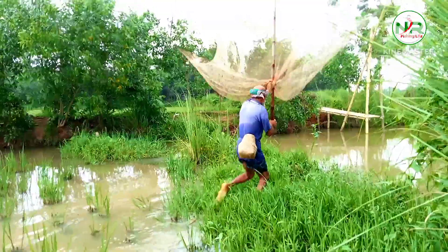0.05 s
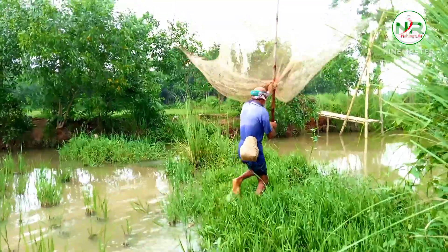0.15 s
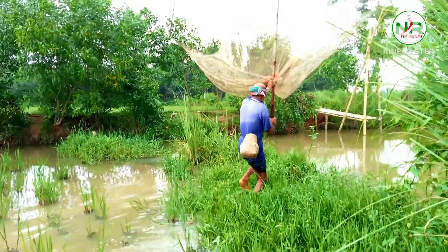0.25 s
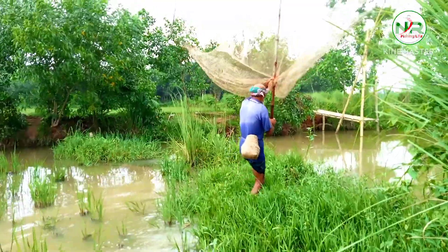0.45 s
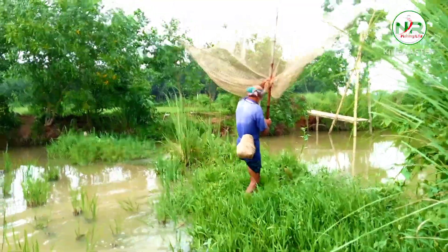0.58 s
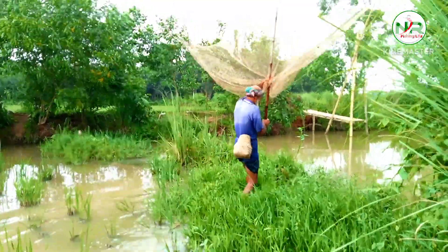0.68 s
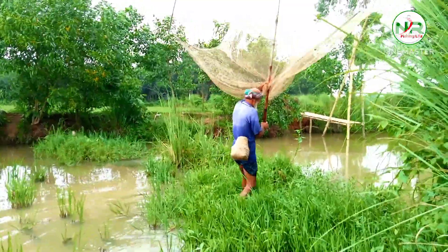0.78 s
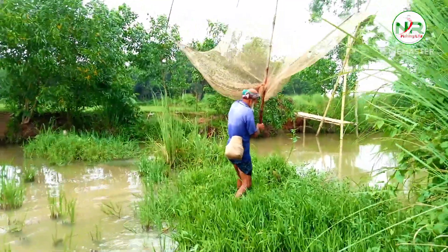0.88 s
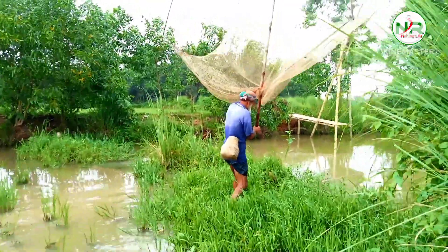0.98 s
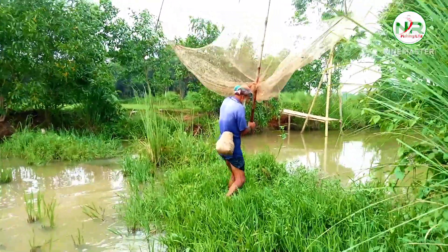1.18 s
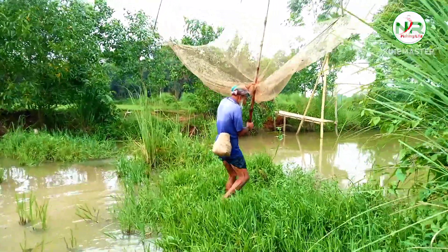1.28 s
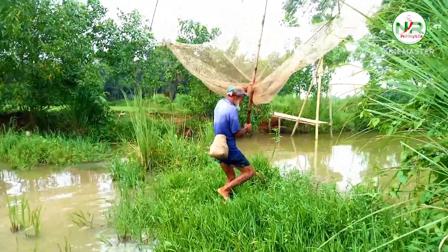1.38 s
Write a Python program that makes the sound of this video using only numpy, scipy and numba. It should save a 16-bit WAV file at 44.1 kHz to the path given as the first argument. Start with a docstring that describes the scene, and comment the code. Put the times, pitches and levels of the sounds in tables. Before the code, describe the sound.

Water sloshes around a fishing net a few metres away, starting at about 0.15 seconds with popping bubbles, fizz and ticking drops. It is loudest from 0.6 to 1 second, then fades. Wind softly bumps the microphone, mostly around 1 second, over faint hiss and distant insects. A far bird trills faintly downwards from 1.2 seconds. Near 1.4 seconds the water stops and the hiss drops.

```python
"""A grassy canal bank, a phone microphone a few metres from where a lift net is hauled.
The water sloshes: trapped bubbles ring and pop, many gliding up, over fizz and ticks of spray,
with a short scatter from the banks. Wind rumbles and bumps on the microphone, far insects
shimmer and a far bird trills downwards. Near the end the water stops abruptly and the
open-air hiss drops."""
import sys
import numpy as np
from scipy import signal
from scipy.fft import rfft, irfft
from scipy.io import wavfile
from scipy.ndimage import uniform_filter1d
from numba import njit

SR = 44100
rng = np.random.default_rng(int(sys.argv[2]) if len(sys.argv) > 2 else 0)


def put_to_file(sound):
    """Save the sound as 16-bit audio at rate SR, in the file named by the first command-line argument."""
    columns = np.atleast_2d(sound).T  # one column per channel
    safe = np.clip(columns, -1, 1)
    whole_steps = np.round(safe * 32767)
    wavfile.write(sys.argv[1], SR, whole_steps.astype(np.int16))


N = 63945
DROP_S = 1.371  # the water stops and the hiss drops


def undb(db):
    """Decibels to gain."""
    return 10 ** (np.asarray(db) / 20)


def unit(x):
    """Scale to rms 1."""
    return x / np.sqrt(np.mean(x ** 2))


def curve(table, col=1):
    """One column of a time table at every sample."""
    rows = np.array(table)
    return np.interp(np.arange(N) / SR, rows[:, 0], rows[:, col])


def colour(x, points):
    """Shape a sound by (frequency [Hz], gain [dB]) points."""
    hz, db = np.array(points).T
    bin_hz = np.maximum(np.arange(N // 2 + 1) * SR / N, 1)
    return irfft(rfft(x) * undb(np.interp(np.log(bin_hz), np.log(hz), db)), N)


def band(x, lo_hz, hi_hz):
    """Band-pass."""
    return signal.sosfilt(signal.butter(2, [lo_hz, hi_hz], "band", fs=SR, output="sos"), x)


def noise_band(lo_hz, hi_hz):
    """Band of noise at rms 1."""
    return unit(band(rng.standard_normal(N), lo_hz, hi_hz))


def walk(per_s):
    """Random steps, smoothed twice; rms 1."""
    hold = int(SR / per_s)
    steps = np.repeat(rng.standard_normal(N // hold + 1), hold)
    return unit(uniform_filter1d(uniform_filter1d(steps, hold), hold)[:N])


@njit
def ring(start_s, hz, gain, decay_s, rise, attack_ms):
    """Damped sines with a soft start; the pitch moves by the fraction `rise` per decay time."""
    out = np.zeros(N)
    for k in range(len(start_s)):
        first, decay = int(start_s[k] * SR), decay_s[k]
        attack = min(attack_ms / 1e3, decay)
        peak_s = attack * np.log(1 + decay / attack)
        phasor = gain[k] / ((1 - np.exp(-peak_s / attack)) * np.exp(-peak_s / decay)) + 0j
        turn = np.exp(2j * np.pi * hz[k] / SR - 1 / (decay * SR))
        glide = np.exp(2j * np.pi * hz[k] * rise[k] / (decay * SR * SR))
        shut, opening = 1., np.exp(-1 / (attack * SR))
        for i in range(min(int(5 * decay * SR), N - first)):
            out[first + i] += (1 - shut) * phasor.imag
            phasor *= turn
            turn *= glide
            shut *= opening
    return out


# Spectrum of the open air on the bank (frequency [Hz], relative level [dB])
AIR_SPECTRUM = [(100, -17), (180, -9), (300, -11.5), (600, -14.5), (1200, -17.5), (3400, -16), (4500, -19),
                (6400, -29), (9400, -22), (12000, -23.5), (15500, -26)]


def air(ring_hz=4390, width_hz=280):
    """Open-air hiss all around, with a faint high ring; both drop near the end."""
    hiss = unit(colour(rng.standard_normal(N), AIR_SPECTRUM)) * undb(-59.5 + walk(per_s=12.1))
    high_ring = noise_band(ring_hz - width_hz / 2, ring_hz + width_hz / 2) * undb(-78)
    return (hiss + high_ring) * np.where(np.arange(N) < DROP_S * SR, 1, undb(-8))


# Wind rumble on the microphone (time [s], level [dB])
WIND_LEVEL = [(0, -71), (.02, -69), (.076, -77), (.12, -71), (.152, -77), (.33, -69), (.512, -63.5),
              (.528, -75), (.626, -70), (.66, -67), (.844, -65.5), (.92, -53), (.96, -63), (1.032, -64),
              (1.066, -63.5), (1.166, -60), (1.25, -66), (1.36, -74), (1.45, -78)]
# Buffets on the microphone (time [s], pitch [Hz], level [dB], decay [ms])
WIND_BUMPS = [(.105, 59.4, -56.5, 12), (.6, 210, -40.5, 26), (0.879, 90.5, -47, 5.1), (0.912, 70, -45, 10),
              (0.941, 79.4, -49, 11), (0.981, 105, -41, 15), (1.021, 78, -34.5, 10.4),
              (1.054, 90, -51, 7.9), (1.087, 82, -41, 4.7), (1.107, 90, -40, 4.1), (1.129, 89.5, -52, 4.9),
              (1.148, 111, -43.5, 5.6)]


def wind():
    """Wind right on the microphone: a low rumble with separate bumps."""
    start_s, hz, db, decay_ms = np.array(WIND_BUMPS, float).T.copy()
    bumps = ring(start_s, hz, undb(db), decay_ms / 1e3, rise=np.zeros_like(hz), attack_ms=5.9)
    rumble = noise_band(lo_hz=55.3, hi_hz=151) * undb(curve(WIND_LEVEL))
    return bumps + rumble


# Insects in the distance (time [s], level [dB])
INSECT_LEVEL = [(0, -79), (.1, -60.5), (.14, -67), (.3, -62.5), (.55, -63), (.9, -67), (1.05, -72),
                (1.2, -70.5), (1.36, -69), (1.38, -75)]


def insects():
    """Far insects, heard from the bank as one narrow, flickering band."""
    flicker_db = 4 * walk(per_s=29.9)
    return noise_band(lo_hz=9000, hi_hz=10330) * undb(curve(INSECT_LEVEL) + flicker_db)


def swarm(per_s, lo_hz, hi_hz, cycles, rise, spread_db, shift=((0, 0), (1, 0))):
    """Bubbles of random time, size and strength, each decaying in about `cycles` periods; rms 1."""
    when, pitch, strength, length = rng.random((int(per_s * N / SR), 4)).T
    start_s = when * N / SR
    octaves = np.interp(start_s, *np.array(shift).T)
    hz = lo_hz * (hi_hz / lo_hz) ** pitch * 2 ** octaves
    db = np.minimum(-spread_db * np.log(1 - strength), 8.5)  # many weak, a few strong
    decay_s = cycles * (.5 + length) / hz
    return unit(ring(start_s, hz, undb(db), decay_s, np.full_like(hz, rise), attack_ms=1.7))


# Churn at the net (time [s], small-bubble level [dB], fizz level [dB], spray level [dB])
CHURN_LEVELS = [(0.12, -68, -79, -59), (0.15, -76, -61, -79), (0.17, -54, -54.5, -61),
                (0.24, -58, -57.5, -63.5), (0.28, -58.5, -56, -62), (0.3, -47, -54, -58.5),
                (0.37, -49.5, -50, -58), (0.42, -45.5, -50, -56), (0.47, -51, -48, -51),
                (0.54, -52, -57, -61.5), (0.587, -50.5, -48.5, -61.5), (0.595, -38, -43, -44.5),
                (0.63, -37.5, -44, -47.5), (0.7, -47, -46.5, -54.5), (0.74, -42.5, -46.5, -49.5),
                (0.78, -47, -43.5, -53), (0.81, -49, -51.5, -61), (0.89, -48.5, -49, -59),
                (1.02, -53, -58, -62), (1.06, -62, -62, -68), (1.14, -62.5, -57, -60.5),
                (1.17, -64, -63.5, -68), (1.25, -89, -70, -63), (1.36, -84, -75, -73)]
# Changing size of the small bubbles (time [s], pitch shift [octaves])
SMALL_BUBBLE_SHIFT = [(.12, 0.87), (0.269, 0.63), (.36, -0.034), (.53, -0.13), (0.559, 0.19), (.62, -0.06),
                      (0.701, 0.526), (.9, 0.51), (0.94, 0.074), (1.05, 0.24)]


def churn():
    """Water stirred by the net a few metres off: bubble swarms from low wash to fine spray."""
    small = swarm(per_s=1500, lo_hz=377.6, hi_hz=1208, cycles=2.97, rise=0.08, spread_db=3.5,
                  shift=SMALL_BUBBLE_SHIFT)
    fizz = swarm(per_s=3500, lo_hz=1177, hi_hz=4920, cycles=2.03, rise=0.051, spread_db=3)
    spray = swarm(per_s=11000, lo_hz=5080, hi_hz=15160, cycles=2.5, rise=0.017, spread_db=1.5)
    wash = swarm(per_s=340, lo_hz=291.4, hi_hz=516, cycles=3.5, rise=0.06, spread_db=5.5)
    crackle = swarm(per_s=230, lo_hz=2150, hi_hz=6630, cycles=1.23, rise=0.03, spread_db=6.5)
    spatter_db = 2 * walk(per_s=130)
    burst_db = 2 * walk(per_s=160)
    low = (small * undb(-2.5) + wash * undb(-16.5)) * undb(curve(CHURN_LEVELS, 1))
    mid = (fizz * undb(-0.64 + spatter_db) + crackle * undb(-8.5)) * undb(curve(CHURN_LEVELS, 2))
    high = spray * undb(curve(CHURN_LEVELS, 3) + burst_db)
    swell = undb(curve([(0, -9), (0.14, 0)]))  # up from calm water
    return (low + mid + high) * swell


# Loud bubbles at the net
# (time [s], pitch [Hz], level [dB], decay [ms], pitch rise [fraction per decay time])
LOUD_BUBBLES = [(0.159, 1340, -48, 3.5, -0.012), (0.1745, 2126, -47.6, 8.6, -0.041),
                (0.215, 3540, -39, 1.5, -0.063), (0.214, 2890, -36, 1.13, -0.03),
                (0.215, 4510, -45, 1.5, -0.021), (0.217, 1226, -43, 4.7, 0.067),
                (0.2877, 658, -42, 2.5, 0.0078), (0.2957, 590, -36.5, 11.4, 0.064),
                (0.313, 690, -46.5, 4.4, 0.003), (0.339, 1640, -44.5, 3.4, -0.0015),
                (0.3453, 1187, -32.5, 2.7, -0.062), (0.362, 350, -47, 7.5, 0.23),
                (0.3737, 458, -42, 22.7, 0.087), (0.398, 580, -41, 5.4, 0.11),
                (0.411, 580, -46, 6.2, 0.067), (0.432, 513, -43.5, 11, -0.039), (0.434, 1644, -49, 23, 0.2),
                (0.4355, 2630, -39, 1.2, 0.031), (0.4586, 3160, -44, 3.1, -0.1),
                (0.461, 398, -45.5, 5.8, 0.029), (0.4608, 776, -38, 4.3, -0.016),
                (0.4659, 1110, -35.5, 3.5, 0.06), (0.48, 410, -45.5, 13, 0.016),
                (0.511, 400, -45, 6.3, -0.02), (0.522, 1076, -43, 2.4, 0), (0.522, 2420, -43.5, 1.9, 0.019),
                (0.541, 630, -47.5, 5.7, -0.034), (0.541, 1120, -41, 2.5, -0.057),
                (0.581, 546, -36, 2.5, 0.065), (0.5947, 1910, -42, 11, -0.02),
                (0.5946, 832, -31.5, 2.4, -0.13), (0.5986, 720, -36.5, 20, 0.056),
                (0.599, 461.5, -33, 21, 0.24), (0.5997, 2880, -35, 2.5, 0.063),
                (0.6048, 2130, -39, 7.5, -0.039), (0.605, 1352, -37.5, 5.9, 0.12),
                (0.607, 621, -35, 8.3, -0.12), (0.6132, 743, -42, 13, 0.052),
                (0.619, 3440, -29.5, 1.55, 0.018), (0.6201, 364, -37, 6.2, -0.0025),
                (0.625, 273, -37, 5.6, 0.022), (0.6295, 865, -42, 1.6, -0.023),
                (0.6469, 496, -33, 6.2, 0.264), (0.6534, 832, -37.5, 22.3, -0.041),
                (0.657, 1090, -34, 4.5, 0.081), (0.6632, 770, -40, 1.9, -0.03),
                (0.6816, 1018, -30.5, 1.84, -0.01), (0.7191, 818, -37.5, 6.8, 0.06),
                (0.7307, 2320, -35.5, 1.94, 0.133), (0.7318, 3510, -46.5, 9.2, 0.014),
                (0.7323, 930, -35, 2.1, -0.037), (0.7405, 1870, -34, 1.9, 0.2),
                (0.7543, 1916, -45.5, 11, 0.1), (0.765, 1230, -49, 7.0, 0.17),
                (0.7647, 2600, -39.5, 2.2, 0.048), (0.7697, 1950, -33, 1.1, -0.0091),
                (0.7865, 1680, -37.5, 2.4, 0.042), (0.8004, 693, -41.5, 9.3, 0.34),
                (0.8358, 1770, -34, 1.8, 0.18), (0.85, 558, -50, 7, -0.073),
                (0.853, 3290, -40.5, 1.7, -0.00054), (0.862, 3876, -40, 1.9, -0.1),
                (0.8756, 694, -30.5, 5, 0.24), (0.875, 1154, -33.5, 2.9, -0.039),
                (0.884, 917, -34.5, 6, 0.027), (0.8794, 1444, -37, 8.3, -0.041),
                (0.879, 1756, -40.5, 6, 0.089), (0.891, 1425, -41, 4.7, 0.038),
                (0.8964, 2870, -43, 3.8, 0.025), (0.928, 455, -45, 5, 0.0022),
                (0.938, 463, -39.5, 8.3, -0.12), (0.965, 3240, -46.5, 2.2, -0.02),
                (0.9663, 1597, -41, 6.2, 0.2), (0.9822, 396, -37.5, 8.9, -0.063),
                (0.9832, 724, -38, 11.8, 0.16), (0.9838, 1655, -48, 8.1, 0.08), (1.0, 1265, -37, 6.7, 0.08),
                (1.0058, 1398, -34.5, 4.4, 0.033), (1.0021, 920, -40, 6.1, 0.012),
                (1.021, 1353, -42.5, 7.3, 0.06), (1.068, 1400, -46, 5.4, 0.064),
                (1.104, 830, -51.5, 3.3, 0.031), (1.1314, 1016, -47.5, 12, -0.055),
                (1.131, 4560, -50.5, 1.4, -0.051), (1.168, 2480, -54.5, 3.8, -0.03),
                (1.223, 1130, -55, 3.8, -0.025)]


def bubbles():
    """Single pockets of air ring out above the churn, gliding as they fade, slightly rough."""
    start_s, hz, db, decay_ms, rise = np.array(LOUD_BUBBLES, float).T.copy()
    pops = ring(start_s, hz, undb(db), decay_ms / 1e3, rise, attack_ms=2.3)
    rough_db = 1.18 * walk(per_s=300)
    return pops * undb(rough_db)


# Droplets a few metres off (time [s], level [dB], centre [Hz], half width [octaves])
DROPLET_TICKS = [(0.215, -41.5, 9540, 0.11), (0.2155, -40.5, 3420, 0.82), (.362, -39, 4260, 0.33),
                 (.398, -43.5, 9620, .4), (.484, -38.5, 4570, 0.36), (.597, -47, 10500, 0.52),
                 (.602, -44, 9300, .15), (0.619, -35.5, 8600, 0.45), (.636, -43, 4450, 0.21),
                 (.657, -44, 9000, .2), (0.6628, -44, 12000, 0.34), (0.666, -44, 6840, 0.087),
                 (.698, -49, 11000, .15), (0.7079, -35.5, 7800, 0.6), (0.7126, -45, 12500, 0.29),
                 (.7175, -44, 9000, .12), (.728, -48, 12500, .3), (0.7336, -34.5, 9900, .4),
                 (.7375, -37, 6500, 0.27), (.745, -46, 9800, 0.29), (.765, -42, 9800, 0.25),
                 (0.7843, -36, 7200, 0.25), (.786, -43.5, 12500, .3), (0.8405, -42.5, 5500, 0.94),
                 (.876, -42, 4350, 0.41), (.892, -44, 4000, 0.35), (0.918, -45, 4800, 0.26),
                 (0.995, -43.5, 9500, 0.34), (1.021, -47, 3000, .3), (1.03, -47.5, 4070, .15),
                 (1.0513, -45, 9700, 0.24), (1.1192, -52, 5000, 0.81), (1.1308, -50.5, 4300, .2),
                 (1.2311, -50.5, 9930, .46)]


def droplets(decay_ms=1.36):
    """Each droplet lands with a short, bright crack of noise."""
    t = np.arange(SR // 20) / SR
    fade = np.exp(-t * 1e3 / decay_ms)
    out = np.zeros(N)
    for start_s, db, hz, octaves in DROPLET_TICKS:
        crack = band(fade * rng.standard_normal(len(t)), hz / 2 ** octaves, hz * 2 ** octaves)
        out[int(start_s * SR):][:len(t)] += undb(db) * unit(crack) / unit(fade)[0]
    return out


def bank_echo(direct, t60_s=0.18, level_db=-11.5):
    """The canal banks scatter a short tail back to the microphone."""
    t = np.arange(SR // 4) / SR
    tail = rng.standard_normal(len(t)) * undb(-60 * t / t60_s)
    return undb(level_db) * signal.fftconvolve(direct, tail / np.linalg.norm(tail))[:N]


# Notes of a far bird
# (time [s], pitch [Hz], level [dB], decay [ms], pitch rise [fraction per decay time])
BIRD_NOTES = [(1.203, 4280, -67, 18, -0.001), (1.213, 3810, -61, 9.3, -.01), (1.226, 3640, -66, 8, -0.02),
              (1.238, 3960, -63, 26, 0.0083), (1.274, 4210, -57, 6.4, -0.0041),
              (1.281, 3070, -60.5, 13, -0.026), (1.3, 2740, -63.5, 20, -0.02), (1.358, 2420, -62, 11, 0),
              (1.355, 2860, -62, 17, 0.0033), (1.385, 2670, -66.5, 9, 0)]


def bird(blur_depth=0.98):
    """A faint trill of short notes stepping downwards, partly blurred by distance."""
    start_s, hz, db, decay_ms, rise = np.array(BIRD_NOTES, float).T.copy()
    notes = ring(start_s, hz, undb(db), decay_ms / 1e3, rise, attack_ms=7.)
    blur = (1 + blur_depth * walk(per_s=120)) / np.hypot(1, blur_depth)
    return notes * blur


# The microphone's colouring of the water (frequency [Hz], gain [dB])
MIC_RESPONSE = [(30, -2), (4500, 0.5), (6400, -7), (9500, 4), (12000, 1), (15500, 0)]


def scene():
    """From the bank, in mono: near water and its echo over wind, bird, insects and air."""
    water = colour(bubbles() + churn() + droplets(), MIC_RESPONSE)
    water = water + bank_echo(water)
    water *= np.arange(N) < DROP_S * SR
    return (water + wind() + bird() + insects() + air())[None]


def record(dry):
    """The phone thins the lowest bass and cuts the top."""
    bass_hz, top_hz = 47, 15480
    thinned = signal.sosfilt(signal.butter(2, bass_hz, "high", fs=SR, output="sos"), dry)
    return signal.sosfilt(signal.ellip(10, .2, 75, top_hz, fs=SR, output="sos"), thinned)


dry = scene()
out = record(dry)
put_to_file(out)
```